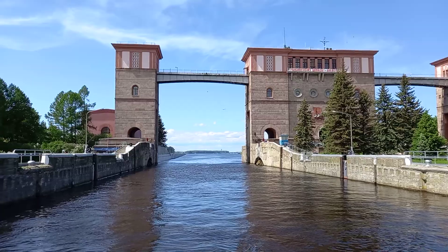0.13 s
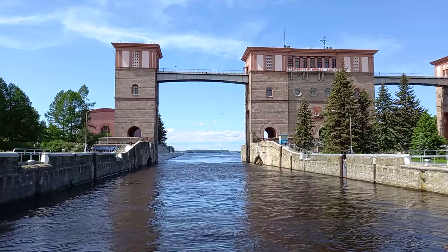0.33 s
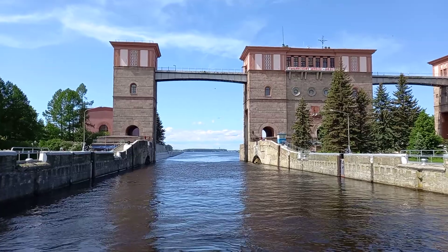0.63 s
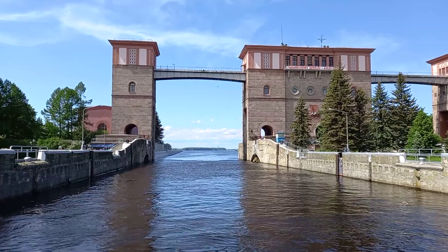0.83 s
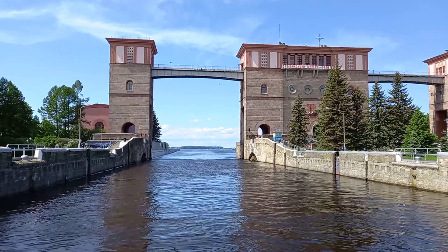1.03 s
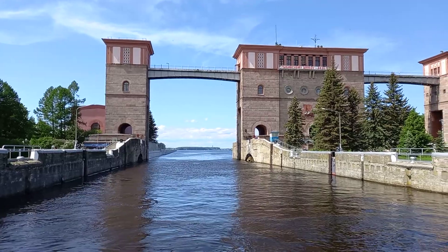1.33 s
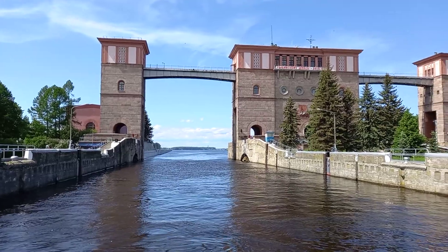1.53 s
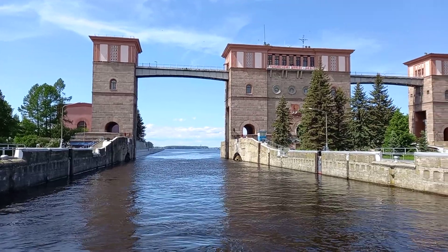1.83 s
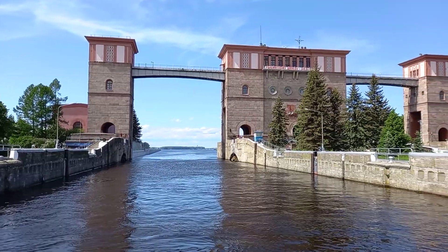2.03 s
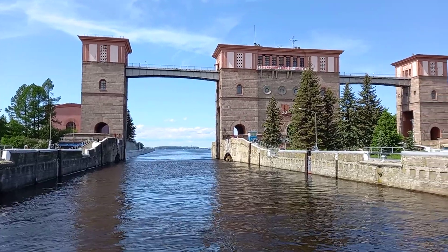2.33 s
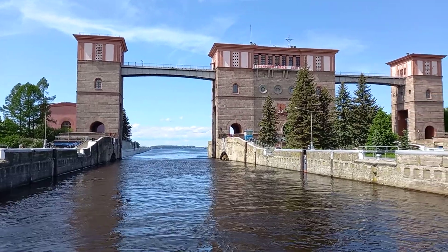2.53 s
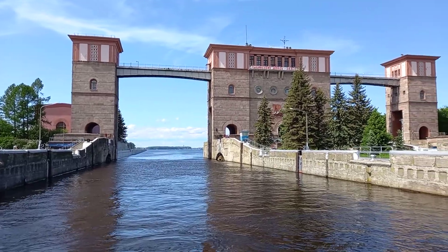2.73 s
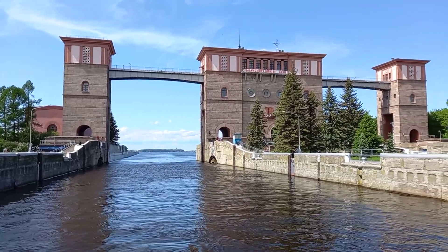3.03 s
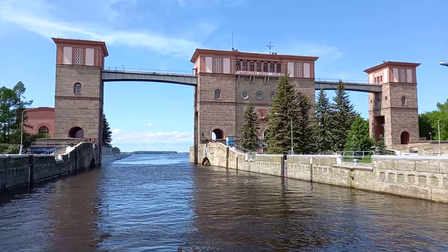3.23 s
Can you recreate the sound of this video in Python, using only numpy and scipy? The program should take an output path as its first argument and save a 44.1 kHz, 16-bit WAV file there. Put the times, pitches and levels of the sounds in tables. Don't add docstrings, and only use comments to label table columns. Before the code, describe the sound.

A boat engine drones low and steady as water washes along the hull in a canal

```python
import sys
import numpy as np
from scipy import signal
from scipy.fft import rfft, irfft
from scipy.io import wavfile

SR = 44100
rng = np.random.default_rng(int(sys.argv[2]) if len(sys.argv) > 2 else 0)


def rack_gain(trim_db):
    fader = np.asarray(trim_db, float)
    return 10 ** (fader / 20)


def store_wav(level_fs):
    pcm = np.round(np.clip(np.atleast_2d(level_fs), -1, 1) * 32767)
    wavfile.write(sys.argv[1], SR, pcm.T.astype(np.int16))


N = 149058
WATER_LAG_S, ENGINE_LAG_S = 0.00026, 0.00017

# (time [s], level [dB])
SURGE = [(.1, 1), (.4, 0.5), (.9, -0.5), (1.3, -.5), (1.7, 2), (1.95, 1), (2.1, 3), (2.3, 2), (2.6, 0.5),
         (2.9, 2.5), (3.1, 3), (3.27, 3.5), (3.38, 5.5)]


def rms_one(x):
    return x / np.sqrt(np.mean(x ** 2) + 1e-20)


def in_time(rows):
    s, *columns = np.transpose(rows)
    return [np.interp(np.arange(N) / SR, s, c) for c in columns]


def at_hz(points, hz, column=1):
    points = np.array(points)
    return np.interp(np.log(hz + 1e-9), np.log(points[:, 0]), points[:, column])


def drift(rate_hz):
    r = np.exp(-80 * np.pi * rate_hz / SR)
    noise = rng.standard_normal(N // 40 + 2002)
    slow = signal.lfilter([1], [1, -2 * r, r * r], noise)[2000:]
    return np.interp(np.arange(N) / 40, np.arange(len(slow)), rms_one(slow))


def panned(x, left_minus_right_db):
    left = rack_gain(left_minus_right_db)
    return 2 * x * np.array([[left], [1]]) / (1 + left)


def late_left(x, lag_s):
    n = np.arange(N)
    return np.array([np.interp(n - lag_s * SR, n, x), x])


def patchy_noise(spectrum, patchy_db, ports, right_spectrum=None, lag_s=WATER_LAG_S):
    hz = np.arange(N // 2 + 1) * SR / N
    white = rfft(rng.standard_normal((3, N)))
    together = drift(2.5)
    out = 0
    for octave in np.arange(np.log2(spectrum[0][0]), np.log2(spectrum[-1][0]) + .5, .5):
        window = np.cos(np.pi * np.clip(np.log2(hz + 1e-9) - octave, -.5, .5)) ** 2
        flicker = rack_gain(patchy_db * (.5 * together + drift(8.3)))
        out = out + flicker * irfft(white * window, N)
    shared, own_left, own_right = rfft(out)
    part = np.clip(at_hz(ports, hz, column=2), 0, 1)
    tilt = rack_gain(at_hz(ports, hz) / 2)
    late = np.exp(-2j * np.pi * hz * lag_s)
    left = (np.sqrt(part) * shared * late + np.sqrt(1 - part) * own_left) * tilt
    right = (np.sqrt(part) * shared + np.sqrt(1 - part) * own_right) / tilt
    left = left * rack_gain(at_hz(spectrum, hz))
    right = right * rack_gain(at_hz(right_spectrum or spectrum, hz))
    pair = irfft([left, right], N)
    return pair / np.sqrt(np.mean(pair.mean(axis=0) ** 2))


def resonance(x, hz, width_hz):
    r = np.exp(-np.pi * width_hz / SR)
    b = [(1 - r * r) / 2, 0, (r * r - 1) / 2]
    a = [1, -2 * r * np.cos(2 * np.pi * hz / SR), r * r]
    return signal.lfilter(b, a, signal.lfilter(b, a, x))


def shaken(modes, flutter_db):
    out = 0
    for hz, width_hz, db in modes:
        ring = rms_one(resonance(rng.standard_normal(N), hz, width_hz))
        out = out + rack_gain(db + flutter_db * drift(12)) * ring
    return out


def shaken_wide(modes, shared_flutter_db, own_flutter_db):
    shared = late_left(shaken(modes, shared_flutter_db), WATER_LAG_S)
    own = np.array([shaken(modes, own_flutter_db), shaken(modes, own_flutter_db)])
    return .6 * shared + .8 * own


def wavering(rows, wobble_hz, flutter_db):
    hz, db = in_time(rows)
    phase = 2 * np.pi * np.cumsum(hz + wobble_hz * drift(4.24)) / SR
    return np.sqrt(2) * rack_gain(db + flutter_db * drift(2.9)) * np.sin(phase)


def wind():
    # (time [s], level [dB])
    gusts = [(.1, -24), (.3, -32.5), (.5, -24.5), (.75, -33), (1.15, -34.5), (1.27, -27), (1.4, -37),
             (1.7, -33), (1.9, -42.5), (2.3, -35), (2.6, -49), (3.0, -36.5), (3.38, -31.5)]
    db, = in_time(gusts)
    sos = signal.butter(3, [55, 140], "band", fs=SR, output="sos")
    noise = rms_one(signal.sosfilt(sos, rng.standard_normal((2, N))))
    lumps = np.array([rack_gain(drift(30) + 3), rack_gain(3.6 * drift(2.6) - 3)])
    return rack_gain(db) * noise * lumps


def bird():
    # (time [s], pitch [Hz], level [dB])
    notes_sung = [
        [(0.13, 5089, -72), (0.137, 4700, -67), (0.148, 4250, -64), (0.178, 3500, -53), (.2, 3130, -58),
         (0.23, 2890, -63)],
        [(.24, 4400, -63), (.26, 3950, -64), (.285, 3450, -65)],
        [(.255, 3200, -58), (.28, 3150, -67), (.315, 3150, -64)],
        [(3.03, 4397, -67), (3.066, 4491, -47.5), (3.082, 4588, -52), (3.104, 4972, -49), (3.122, 5096, -55),
         (3.132, 5061, -64), (3.15, 5030, -74)],
        [(3.18, 5170, -64), (3.195, 4830, -57), (3.208, 4550, -57), (3.215, 4380, -59), (3.222, 4150, -53),
         (3.232, 3850, -50), (3.243, 3763, -45), (3.253, 3906, -51), (3.272, 3866, -54), (3.285, 3846, -67),
         (3.33, 3850, -72)],
    ]
    t = np.arange(N) / SR
    out = 0
    for note in notes_sung:
        hz, db = in_time(note)
        edge = np.clip(np.minimum(t - note[0][0], note[-1][0] - t) / 0.012, 0, 1)
        level = np.sqrt(2) * rack_gain(db + 0.2 + 3.1 * drift(50))
        out = out + level * edge * np.sin(2 * np.pi * np.cumsum(hz) / SR)
    echoes = 0
    for k in range(3):
        delay_s = .03 * (k + 1) * rng.uniform(.8, 0.85)
        echoes = echoes + rack_gain(-25 - 1.9 * k) * np.roll(out, int(delay_s * SR))
    return panned(out, -22) + panned(echoes, -15)


def ticks():
    # (time [s], level [dB], pitch [Hz], length [s], left minus right [dB])
    bursts = [(.189, -60, 5800, .003, -12), (.2, -63, 5200, .003, -12), (.217, -62, 5000, .003, -12),
              (0.289, -58, 6500, 0.005, -10), (.386, -63, 5800, .004, -12), (.434, -63, 5800, .003, -12),
              (.594, -60, 4700, .003, -12), (.688, -60, 4900, .003, -12), (.465, -60, 5700, 0.0098, -14),
              (.617, -57, 6300, .003, -14), (.629, -58, 6500, .003, -12), (1.334, -60, 14000, .004, -24),
              (1.335, -67, 6500, 0.0026, -14), (1.349, -76.5, 13500, 0.047, -10),
              (1.741, -84.5, 12700, 0.041, 16), (2.33, -71.5, 13900, .003, -6.5),
              (2.413, -79, 12500, 0.0034, -13), (2.438, -63, 7800, .02, 14), (2.451, -61, 8200, .01, 21),
              (2.446, -74.5, 13000, 0.035, -4), (2.465, -62, 6200, 0.0081, -1),
              (2.535, -63.5, 5800, .003, -13), (3.208, -66, 6300, .005, -4.5)]
    out, t = np.zeros((2, N)), np.arange(N) / SR
    for s, db, hz, length_s, pan_db in bursts:
        i = int((s - 0.27 * length_s) * SR)
        age = t[:int(5 * length_s * SR)] / length_s
        burst = resonance(rng.standard_normal(SR // 4), hz, hz * hz / 40000)[-len(age):]
        envelope = np.exp(-age) * np.minimum(age / 0.25, 1)
        out[:, i:i + len(age)] += panned(rack_gain(db) * rms_one(burst) * envelope, pan_db)
    return out


def drops():
    rate_hz, ring_cycles = 70, 14
    strength = rack_gain(3.5 * np.minimum(rng.exponential(1, N), 2.5))
    born = (rng.random(N) < rate_hz / SR) * strength
    dealt = rng.integers(0, 12, N)
    out = 0
    for k, hz in enumerate(np.geomspace(3500, 6800, 12)):
        out = out + resonance(born * (dealt == k) + 1e-18, hz, hz / ring_cycles)
    return panned(rack_gain(-77) * rms_one(out), -8.0)


def spray():
    # (time [s], level [dB])
    spray_level = [(0.12, -63.5), (0.25, -65), (0.35, -64), (.6, -66.5), (0.95, -70), (1.03, -78),
                   (1.15, -90), (1.3, -92)]
    # (frequency [Hz], density [dB per Hz])
    spray_colour = [(8000, -30), (9300, -12), (10000, -4.5), (11200, -7.5), (11500, -2.5), (13200, -4),
                    (13600, -6.5), (15800, -8)]
    db, = in_time(spray_level + [(1.6, -110)])
    # (frequency [Hz], left minus right [dB], shared part [0-1])
    ports = [(9000, -8.0, .3), (12000, -17, 0.33), (15000, -12, .3)]
    return rack_gain(db) * patchy_noise(spray_colour, patchy_db=.2, ports=ports)


def churn():
    # (time [s], level [dB])
    churn_level = [(.1, -54.5), (.3, -60.5), (.5, -61.5), (.95, -76), (1.3, -97)]
    # (frequency [Hz], density [dB per Hz])
    churn_colour = [(2500, -20.5), (3300, -4), (4500, -6), (6300, -13), (7200, -15), (9000, -24)]
    db, = in_time(churn_level)
    ports = [(3000, -6.0, 0.22), (7000, -5, .3)]
    return rack_gain(db) * patchy_noise(churn_colour, patchy_db=2.0, ports=ports)


def fizz():
    # (frequency [Hz], density [dB per Hz])
    fizz_left = [(4000, -110), (5200, -96), (6300, -105), (8300, -97), (8900, -99), (9300, -108),
                 (10500, -117), (15700, -122)]
    # (frequency [Hz], density [dB per Hz])
    fizz_right = [(4000, -110), (5200, -94), (6500, -96), (7000, -103), (7400, -118), (8400, -135),
                  (10000, -123), (15700, -121)]
    ports = [(5000, 0, 0.16)]
    return rack_gain(-66) * patchy_noise(fizz_left, patchy_db=0.85, ports=ports, right_spectrum=fizz_right)


def wash():
    # (frequency [Hz], density [dB per Hz])
    wash_colour = [(500, -92), (750, -69), (1000, -74.5), (1450, -74.5), (1900, -78), (2500, -84),
                   (3300, -87.5), (5000, -95)]
    # (frequency [Hz], left minus right [dB], shared part [0-1])
    wash_ports = [(706, -5.5, 0.7), (1250, -2.5, 1), (2230, -3.5, 0.1), (4700, -1, 0.3)]
    surge_db, = in_time(SURGE)
    return rack_gain(surge_db - 49) * patchy_noise(wash_colour + [(5800, -125)], patchy_db=0.5, ports=wash_ports)


def fitting():
    # (time [s], level [dB])
    flares = [(.1, -5), (.26, 4), (.36, -4), (.45, 4), (.6, -4), (.87, 8.5), (1.0, -5), (1.25, 8),
              (1.5, -3.5), (2.1, 1.5), (2.45, -1.5), (2.65, 1), (2.85, 3), (2.98, -5), (3.12, 0),
              (3.38, -12)]
    # (frequency [Hz], width [Hz], level [dB])
    fitting_modes = [(2115, 110, -61), (2210, 130, -64)]
    flare_db, = in_time(flares)
    return rack_gain(flare_db) * shaken_wide(fitting_modes, 1, 1)


def deck():
    # (frequency [Hz], width [Hz], level [dB])
    deck_modes = [(560, 60, -44.5), (800, 80, -52), (1150, 100, -58), (1660, 140, -64), (2130, 300, -60)]
    surge_db, = in_time(SURGE)
    return rack_gain(surge_db) * shaken_wide(deck_modes, 2, 1.5)


def shudders():
    # (time [s], level [dB], pitch [Hz], length [s])
    swells = [
        (.2, -31.5, 87.7, 0.086),
        (0.503, -30, 120, .1),
        (1.86, -28, 123, 0.1),
        (2.386, -24, 54.4, 0.08),
        (2.842, -27.5, 132, 0.048),
        (3.13, -26, 125, 0.027),
        (3.38, -26, 61.6, 0.036),
    ]
    t = np.arange(N) / SR
    out = 0
    for s, db, hz, length_s in swells:
        bell = np.exp(-((t - s) / length_s) ** 2)
        out = out + np.sqrt(2) * rack_gain(db) * bell * np.sin(2 * np.pi * hz * t)
    return out


def hull(load_db):
    # (frequency [Hz], width [Hz], level [dB])
    hull_modes = [(53.76, 6, -36), (72.2, 9.7, -43.5), (125, 12, -37.5), (144.4, 6, -36.5),
                  (192.8, 13, -37), (218.3, 41, -39.5)]
    return rack_gain(0.27 * (load_db - load_db.mean())) * shaken(hull_modes, 0.55)


def rumble(load_db):
    # (frequency [Hz], density [dB per Hz])
    rumble_colour = [(25, -28.5), (40, -9.5), (55, 3), (100, -5.5), (250, -5.5), (320, -10), (600, -17),
                     (1000, -34)]
    ports = [(101, 0.0054, 0.92), (286, 0, 0.89), (750, 0.0048, 0.5)]
    noise = patchy_noise(rumble_colour, patchy_db=0.0, ports=ports, lag_s=ENGINE_LAG_S)
    return rack_gain(load_db + 9.5) * noise


def tones():
    # (time [s], pitch [Hz], level [dB])
    exhaust = [(.11, 230, -36), (.35, 224, -34), (.9, 228, -39), (1.1, 229, -32), (1.3, 229, -37),
               (1.47, 229, -31), (1.75, 233, -30), (1.9, 231, -38), (2.04, 229, -30), (2.16, 235, -23),
               (2.22, 239, -30), (2.28, 243, -20), (2.38, 245, -22.5), (2.56, 245, -16), (2.75, 245, -22.5),
               (2.9, 245, -30), (3.1, 245, -38), (3.38, 245, -44)]
    # (time [s], pitch [Hz], level [dB])
    rough_exhaust = [(.11, 250, -36), (.6, 250, -40), (1.3, 262, -36), (1.6, 255, -44), (1.76, 257, -32),
                     (1.96, 250, -32), (2.1, 255, -44), (2.7, 258, -42), (2.86, 265, -27.5),
                     (3.0, 267, -29), (3.14, 271, -26), (3.22, 276, -40), (3.28, 283, -31),
                     (3.38, 284, -32)]
    # (time [s], pitch [Hz], level [dB])
    generator = [(.11, 190, -32.5), (.6, 189.5, -34.5), (1.0, 191, -38.5), (1.5, 190, -36.5),
                 (1.8, 190, -49), (2.0, 188.6, -30.5), (2.3, 189, -44), (3.38, 192.4, -45.5)]
    return wavering(exhaust, .7, .6) + wavering(rough_exhaust, 3.0, 2.5) + wavering(generator, 1.16, 4.0)


def engine():
    # (time [s], level [dB])
    load = [(.11, -35), (.5, -36), (1.1, -35), (1.7, -35), (2.2, -33.5), (2.8, -35), (3.38, -34)]
    load_db, = in_time(load)
    body = hull(load_db) + tones() + shudders()
    return rumble(load_db) + deck() + fitting() + late_left(body, ENGINE_LAG_S)


def scene():
    water = ticks() + drops() + spray() + churn() + fizz() + wash()
    return wind() + bird() + water + engine()


def band_limit(x):
    return signal.sosfilt(signal.butter(12, 15780, fs=SR, output="sos"), x)


def record(dry):
    start_s, fade_in_s, fade_out_s = .1055, .002, .0015
    cut = signal.sosfilt(signal.butter(2, 38, "high", fs=SR, output="sos"), dry)
    t = np.arange(N) / SR
    edges = np.clip(np.minimum((t - start_s) / fade_in_s, (t[-1] - t) / fade_out_s), 0, 1)
    return band_limit(cut * edges)


dry = scene()
out = record(dry)
store_wav(out)
```